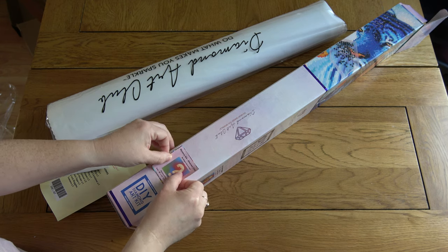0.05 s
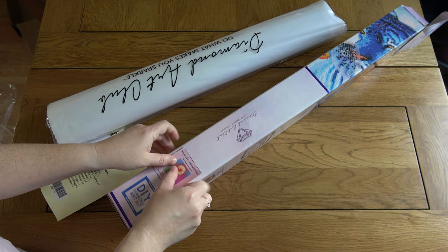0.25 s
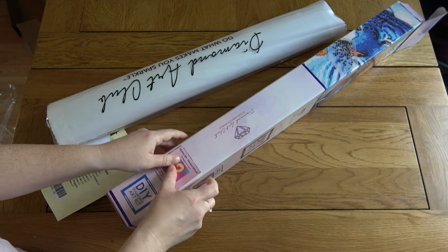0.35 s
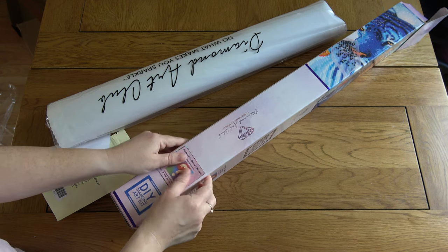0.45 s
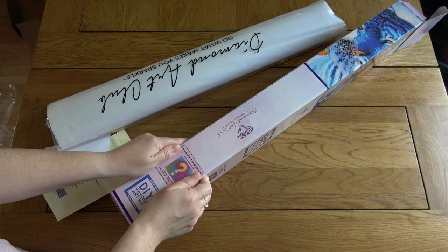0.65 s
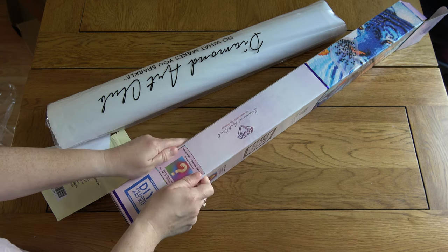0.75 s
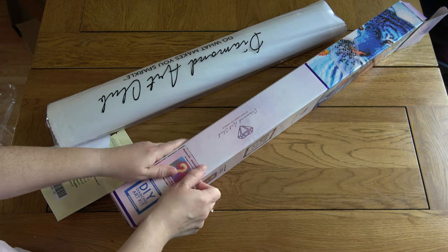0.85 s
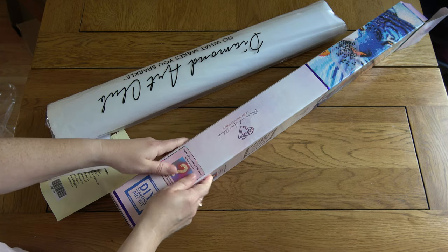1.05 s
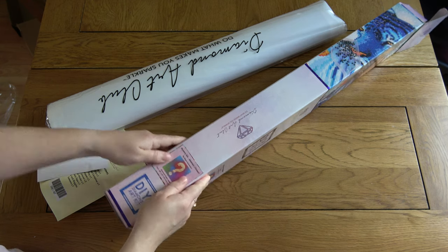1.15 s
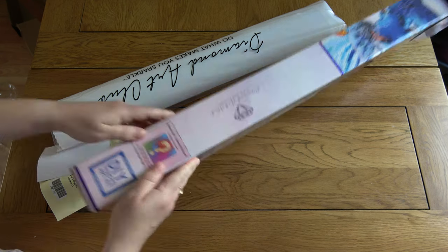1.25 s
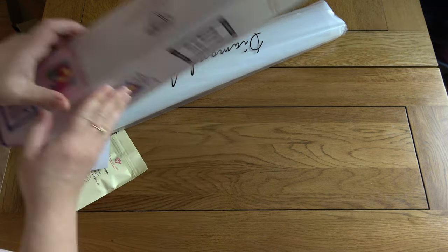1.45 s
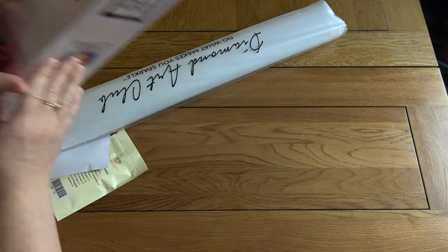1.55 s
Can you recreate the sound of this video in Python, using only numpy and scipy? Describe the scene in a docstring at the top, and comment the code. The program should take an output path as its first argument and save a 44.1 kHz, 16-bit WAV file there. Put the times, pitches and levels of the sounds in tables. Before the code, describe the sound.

A long cardboard box is picked at, giving a sharp snap and hollow knocks, then slides and rustles

```python
"""A quiet room, one mono microphone, heard close: the direct sound stands well above the wall echoes.
Fingers pick a sticker off a long cardboard box on a wooden table: glue snaps are noise bursts ringing the film.
Knocks are short pushes that ring the hollow box; dense small touches keep it rumbling and the film rustling.
The box slides over paper and wood and a palm swipes along it: clicks through drifting resonances.
A thin dragging hiss and steady room air lie beneath."""
import sys
import numpy as np
from scipy import signal
from scipy.fft import rfft, irfft
from scipy.io import wavfile
from scipy.ndimage import map_coordinates

SR = 44100
rng = np.random.default_rng(int(sys.argv[2]) if len(sys.argv) > 2 else 0)


def wrap_up_sound(samples):
    """Save the sound to the file named by the first command line argument, as 16-bit audio."""
    columns = np.atleast_2d(samples).T
    # keep every value between -1 and 1, then stretch to whole-number steps
    tamed = np.clip(columns, -1, 1)
    steps = np.round(tamed * 32767).astype(np.int16)
    wavfile.write(sys.argv[1], SR, steps)


N = 70560

# Snaps of the glue. Each row: start in seconds, direct peak in dB, favoured pitch in Hz, length in ms.
SNAP_EVENTS = [(0.1851, -31.5, 3700, 1.57), (0.2451, -18, 3050, 0.77), (0.2479, -15.5, 4140, 2.74),
               (0.286, -21.5, 3450, 3.9), (0.2938, -30, 3600, 5.1), (0.3555, -5.5, 4700, 2.76),
               (0.448, -33, 3400, 3.3), (0.4753, -30, 2400, 1.6), (.649, -39.5, 3720, 6.4),
               (0.663, -37, 3300, 2.7), (0.702, -37, 5040, 5.3), (0.8414, -24.5, 5070, 0.37),
               (0.997, -39.5, 3370, 1.9), (1.023, -32.5, 3480, 0.94), (1.037, -40, 6650, 10.4),
               (1.1321, -35, 8800, 1.9), (1.39, -38, 4700, 0.98)]
# Modes of the sticker film and box wall. Each row: frequency in Hz, relative level in dB.
FILM_MODES = [(1000, 3), (1500, 6), (2400, 6), (3450, 4), (4350, -1.5), (5150, -9), (6200, -2.5),
              (8300, -8.5), (10300, -30), (13000, -24)]
# Knocks on the box. Each row: start in seconds, level in dB, pitch of the contact in Hz.
KNOCK_EVENTS = [(0.158, -36.5, 500), (0.2527, -17, 437), (0.355, -4.5, 627), (0.36, -13, 630),
                (0.3628, -9.5, 426), (0.373, -24, 560), (0.415, -15.5, 376), (0.4397, -19.5, 270),
                (0.466, -19.5, 411), (0.4752, -14.5, 440), (0.482, -27, 375), (0.592, -20.5, 317),
                (0.622, -31, 316), (0.842, -33, 786), (0.899, -27.5, 467), (0.925, -29, 540),
                (1.0459, -31, 630), (1.0814, -26.5, 525), (1.0876, -26.5, 278), (1.102, -50, 394),
                (1.147, -34, 497), (1.2348, -23, 244), (1.303, -24, 260), (1.3118, -16, 243),
                (1.3167, -26, 163)]
# Modes of the hollow box. Each row: frequency in Hz, relative level in dB.
BOX_MODES = [(151, -14), (212, -11), (280, -7.5), (319, -3.5), (428, 1), (480, -5.5), (565, 0.5), (665, -2),
             (776, -0.5), (920, -3.5), (1055, -3.5), (1470, -2.5)]
# Low rumble of handling the box. Each row: time in seconds, level in dB.
HANDLING_CURVE = [(0, -66.5), (.15, -59.5), (.23, -48), (.5, -50), (.7, -49.5), (.82, -57), (.87, -45.5),
                  (.95, -47), (1.0, -59), (1.06, -42.5), (1.12, -50), (1.2, -43.5), (1.3, -47),
                  (1.515, -49), (1.6, -44.5)]
# Rustle of film and paper. Each row: time in seconds, level in dB.
RUSTLE_CURVE = [(0, -86), (.17, -62.5), (.2, -52), (.3, -63), (.34, -52.5), (.46, -61.5), (.62, -58),
                (.67, -56), (.8, -62), (.87, -50), (.97, -60), (1.03, -56), (1.1, -57.5), (1.18, -48),
                (1.33, -54), (1.45, -60), (1.6, -51)]
# Box sliding on paper and wood.
# Each row: start in seconds, rise in seconds, hold in seconds, fall by 60 dB in seconds, level in dB.
SLIDE_STROKES = [(1.14, 0.059, 0.087, 0.09, -47.5)]
# Resonances of the slide. Each row: frequency in Hz, width in Hz, relative level in dB.
SLIDE_RESONANCES = [(900, 600, 5), (3300, 1200, -1), (6400, 400, -1), (7350, 300, 1), (8700, 450, 0)]
# Palm swipes along the box.
# Each row: start in seconds, rise in seconds, hold in seconds, fall by 60 dB in seconds, level in dB.
SWIPE_STROKES = [(1.342, 0.047, 0.005, 0.0087, -43.5), (1.532, 0.009, 0.0073, 0.18, -35)]
# Resonances of the swipes. Each row: frequency in Hz, width in Hz, relative level in dB.
SWIPE_RESONANCES = [(1710, 1200, 1), (3740, 430, 10), (4480, 750, 10.5), (5930, 1100, -6), (7850, 2450, 6),
                    (12300, 800, -13)]
# Thin dragging hiss. Each row: time in seconds, level in dB.
DRAG_CURVE = [(0, -119), (.3, -54.5), (.45, -50), (.7, -56.5), (.8, -67), (1.13, -58), (1.24, -47),
              (1.33, -60.5), (1.6, -100)]
# Resonances of the drag. Each row: frequency in Hz, width in Hz, relative level in dB.
DRAG_RESONANCES = [(1390, 1120, -1), (2404, 380, -0.5), (6000, 360, -11.5)]
# Colour of the room air. Each row: frequency in Hz, relative level in dB per Hz.
AIR_COLOUR = [(40, -11), (112, -10.5), (151, -4), (194, -22.5), (269, -18.5), (16000, -35.5)]

FILM_T60_S = 0.0057
SNAP_FOCUS_DB, SNAP_WIDTH_OCT = 13, 0.31  # boost of the film modes near a snap's pitch
SOFT_DULLING = 0.078  # away from its pitch a snap loses this many dB per octave for each dB of softness
KNOCK_RING_DB, KNOCK_WIDTH_OCT, KNOCK_PUSH_DB = -9.5, 0.27, -9
BOX_T60_S, BOX_T60_SLOPE = 0.07, -1.03  # at 400 Hz; power of frequency
RUMBLE_PER_S, RUMBLE_SPREAD_DB = 1500, 6
SHUDDER_DB, SHUDDER_T60_S = -21.5, 0.15  # rumble that trails each knock
SHUDDER_DB_PER_OCT = 7  # sharper knocks shake the box more
CRACKLES_PER_S, CRACKLE_SPREAD_DB, RUSTLE_TILT_DB = 3200, 2, 9.5  # tilt is per octave
CREASES_PER_S, CREASE_DB, CREASE_TOP_HZ = 240, 5, 5600  # sparser cracks that ring the lower modes at once
AFTER_DB, AFTER_T60_S = -28.5, 0.19  # crackle that trails each snap
WANDER, WANDERS_PER_S = 0.012, 25  # spread of the rubbing's pitch drift as a share; drift points per second
ROOM_T60_S, TREBLE_T60_S, ROOM_GAP_S = 0.3, 0.13, 0.00403
WALL_CUT_HZ, ROOM_DB = 2000, -11
SNAP_ROOM_DB = -14  # snaps reach the walls less than knocks
AIR_DB = -58.5
BASS_CUT_HZ, CUTOFF_HZ = 100, 16450


def snaps():
    """Glue lets go in a burst of a few milliseconds that rings the film, most near its favoured pitch."""
    out = np.zeros(N + SR)
    t = np.arange(SR // 20) / SR
    for s, db, pitch_hz, ms in SNAP_EVENTS:
        burst = rng.standard_normal(len(t)) * np.exp(-(t * 1000 / max(ms, 0.3)) ** 4)
        sound = 0
        for hz, mode_db in FILM_MODES:
            octaves = np.log2(hz / pitch_hz)
            focus_db = SNAP_FOCUS_DB * np.exp(-0.5 * (octaves / SNAP_WIDTH_OCT) ** 2)
            dulling_db = SOFT_DULLING * db * abs(octaves)  # negative, as db is
            ringing = rms_one(ring(burst, hz, FILM_T60_S * np.sqrt(3500 / hz)))
            sound = sound + amp(mode_db + dulling_db + focus_db) * ringing
        i = int(s * SR)
        out[i:i + len(t)] += amp(db) * sound / np.abs(sound).max()
    return out[:N]


def knocks():
    """Each knock is a short push at its pitch that sets the nearby box modes ringing."""
    out = np.zeros(N + SR)
    t = np.arange(SR // 4) / SR
    for s, db, pitch_hz in KNOCK_EVENTS:
        cycles = t * pitch_hz
        push_shape = np.sin(np.pi * np.minimum(cycles / 1.5, 1))  # over after 1.5 cycles
        sound = -amp(KNOCK_PUSH_DB) * np.sin(2 * np.pi * cycles) * push_shape
        for hz, mode_db in BOX_MODES:
            near = np.exp(-0.5 * (np.log2(hz / pitch_hz) / KNOCK_WIDTH_OCT) ** 2)
            luck_db = rng.normal(0, 1.5)  # no two knocks ring the modes alike
            fade = amp(KNOCK_RING_DB + mode_db + luck_db - 60 * t / box_t60(hz))
            sound -= near * np.minimum(cycles, 1) * fade * np.sin(2 * np.pi * hz * t)
        i = int(s * SR)
        out[i:i + len(t)] += amp(db) * sound
    return out[:N]


def box_t60(hz):
    """Higher box modes die sooner."""
    return BOX_T60_S * (hz / 400) ** BOX_T60_SLOPE


def rumble():
    """Fingers and table keep the box modes murmuring with dense small touches."""
    shakes = [(s, db + SHUDDER_DB_PER_OCT * np.log2(pitch_hz / 500)) for s, db, pitch_hz in KNOCK_EVENTS]
    loudness = level(HANDLING_CURVE) + trail(shakes, SHUDDER_DB, SHUDDER_T60_S)
    murmur = 0
    for hz, db in BOX_MODES:
        touches = grains(RUMBLE_PER_S, RUMBLE_SPREAD_DB)
        murmur = murmur + amp(db) * ring(touches, hz, box_t60(hz))
    return loudness * rms_one(murmur)


def rustle():
    """Film and paper rustle as dense crackles and sparse cracks ring the film modes."""
    loudness = level(RUSTLE_CURVE) + trail(SNAP_EVENTS, AFTER_DB, AFTER_T60_S)
    cracks = amp(CREASE_DB) * grains(CREASES_PER_S, spread_db=3.0)
    rustling = 0
    for hz, db in FILM_MODES[2:]:
        clicks = cracks * (hz < CREASE_TOP_HZ) + grains(CRACKLES_PER_S, CRACKLE_SPREAD_DB)
        tilted_db = db + RUSTLE_TILT_DB * np.log2(hz / 3500)
        rustling = rustling + amp(tilted_db) * ring(clicks, hz, FILM_T60_S * 2000 / hz)
    return loudness * rms_one(rustling)


def strokes(rows, bands):
    """A rubbing hiss that swells, holds and dies; its resonances wander as the grip shifts."""
    t = np.arange(N) / SR
    shape = 0
    for s, rise, hold, fall, db in rows:
        swell = np.clip((t - s) / rise, 0, 1) ** 0.9
        shape = shape + amp(db - 60 * np.maximum(t - s - rise - hold, 0) / fall) * swell
    knots = rng.standard_normal(int(WANDERS_PER_S * N / SR) + 2)
    speed = 1 + WANDER * np.interp(t * WANDERS_PER_S, np.arange(len(knots)), knots)
    hiss = through(bands, grains(7000, spread_db=2.0))
    # reading the hiss at a drifting speed bends its resonances
    return shape * rms_one(map_coordinates(hiss, [np.cumsum(speed)], order=3, mode="mirror"))


def drag():
    """A thin dragging hiss: dense clicks through fixed resonances."""
    return level(DRAG_CURVE) * through(DRAG_RESONANCES, grains(4000, spread_db=2.0))


def room(x):
    """Diffuse echoes: noise that dies away, the treble sooner."""
    t = np.arange(SR // 2) / SR
    noise = rng.standard_normal(SR // 2)
    bass = signal.sosfilt(signal.butter(1, WALL_CUT_HZ, fs=SR, output="sos"), noise)
    tail = bass * amp(-60 * t / ROOM_T60_S) + (noise - bass) * amp(-60 * t / TREBLE_T60_S)
    tail = tail * (t > ROOM_GAP_S)  # silence before the first echo
    return signal.fftconvolve(x, tail / np.sqrt(np.sum(tail ** 2)))[:N]


def air():
    """Steady room air: noise shaped to the air's colour."""
    hz, db = np.transpose(AIR_COLOUR)
    f = np.maximum(np.fft.rfftfreq(N, 1 / SR), 10)
    colour = amp(np.interp(np.log(f), np.log(hz), db))
    return amp(AIR_DB) * rms_one(irfft(rfft(rng.standard_normal(N)) * colour, N))


def amp(db):
    """dB to gain."""
    return 10 ** (np.asarray(db) / 20)


def rms_one(x):
    """Scale to rms 1."""
    return x / np.sqrt(np.mean(x ** 2) + 1e-20)


def level(rows):
    """A curve of seconds and dB as a gain per sample."""
    s, db = np.transpose(rows)
    return amp(np.interp(np.arange(N) / SR, s, db))


def trail(rows, db_below, t60):
    """A gain that jumps at each event and dies away."""
    t = np.arange(N) / SR
    return sum((t >= s) * amp(db + db_below - 60 * np.maximum(t - s, 0) / t60) for s, db, *_ in rows)


def ring(x, hz, t60):
    """A two-pole resonator: a unit click sets a dying sine of height 1 ringing."""
    r = amp(-60 / (max(t60, 0.001) * SR))
    w = 2 * np.pi * hz / SR
    return signal.lfilter([0, np.sin(w)], [1, -2 * r * np.cos(w), r * r], x + 1e-18)


def grains(per_s, spread_db):
    """Random clicks of uneven size and sign."""
    sizes = amp(spread_db * np.minimum(rng.exponential(1, N), 4)) * rng.choice([-1, 1], N)
    return sizes * (rng.random(N) < per_s / SR)


def through(bands, x):
    """Parallel resonances of alternating sign, each applied twice; rms 1."""
    out = 0
    for k, (hz, width_hz, db) in enumerate(bands):
        r = np.exp(-np.pi * width_hz / SR)
        stage = [(1 - r * r) / 2, 0, (r * r - 1) / 2, 1, -2 * r * np.cos(2 * np.pi * hz / SR), r * r]
        out = out + (-1) ** k * amp(db) * signal.sosfilt([stage, stage], x)
    return rms_one(out)


def scene():
    """All sources over the room air; the light box radiates no deep bass."""
    bass_cut = signal.butter(3, BASS_CUT_HZ, "high", fs=SR, output="sos")
    snap, knock, murmur = signal.sosfilt(bass_cut, [snaps(), knocks(), rumble()])
    slide = strokes(SLIDE_STROKES, SLIDE_RESONANCES)
    swipe = strokes(SWIPE_STROKES, SWIPE_RESONANCES)
    rubbing = murmur + rustle() + slide + swipe + drag()
    echoes = amp(ROOM_DB) * room(knock + amp(SNAP_ROOM_DB) * snap)
    return (snap + knock + rubbing + echoes + air())[None]


def record(dry):
    """One microphone channel with the extreme treble steeply cut."""
    return signal.sosfilt(signal.cheby2(14, 60, CUTOFF_HZ, fs=SR, output="sos"), dry)


dry = scene()
out = record(dry)
wrap_up_sound(out)
```